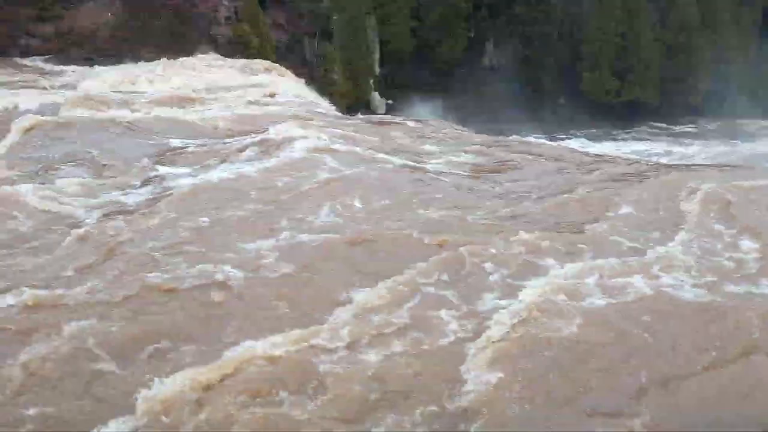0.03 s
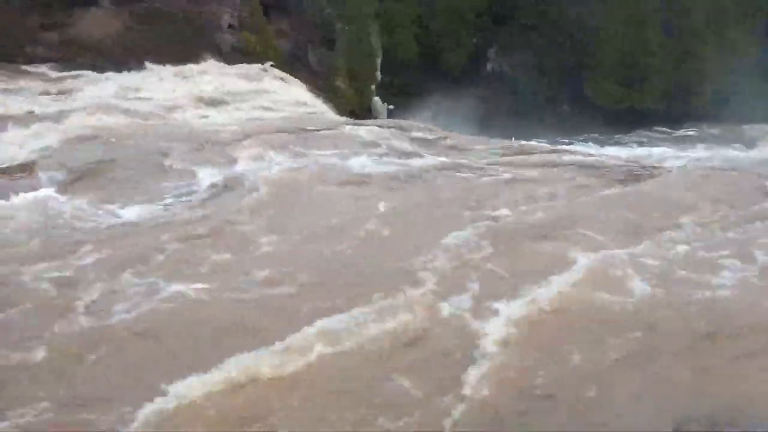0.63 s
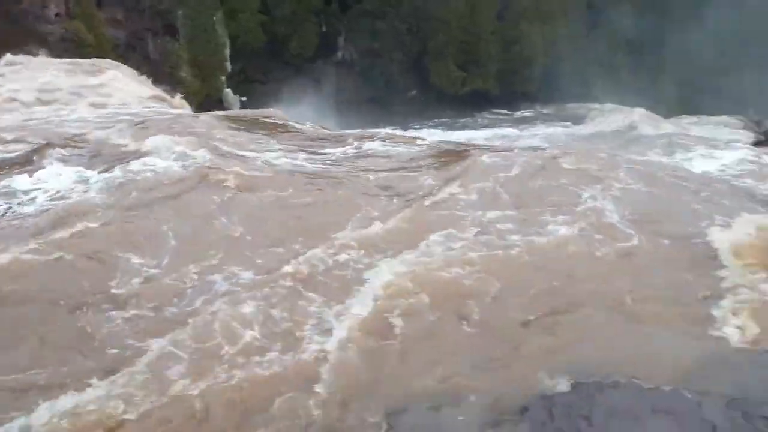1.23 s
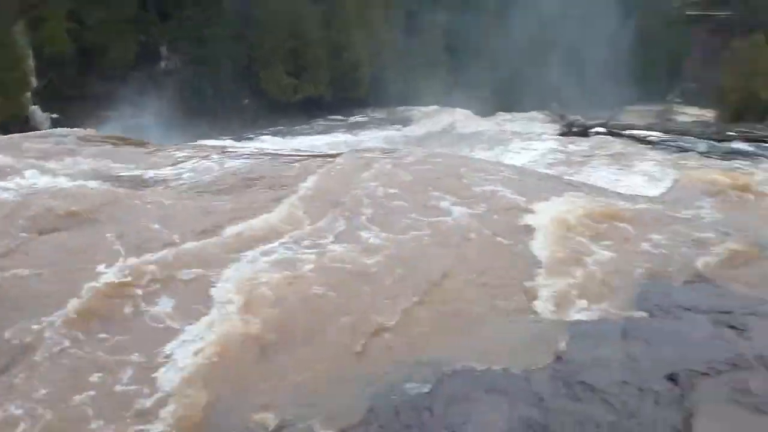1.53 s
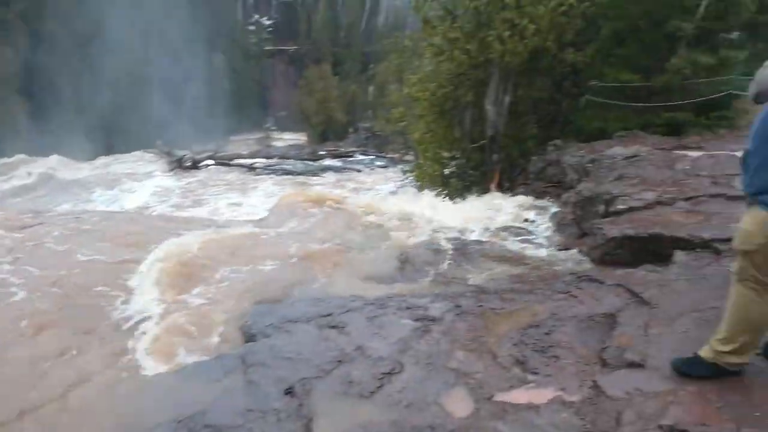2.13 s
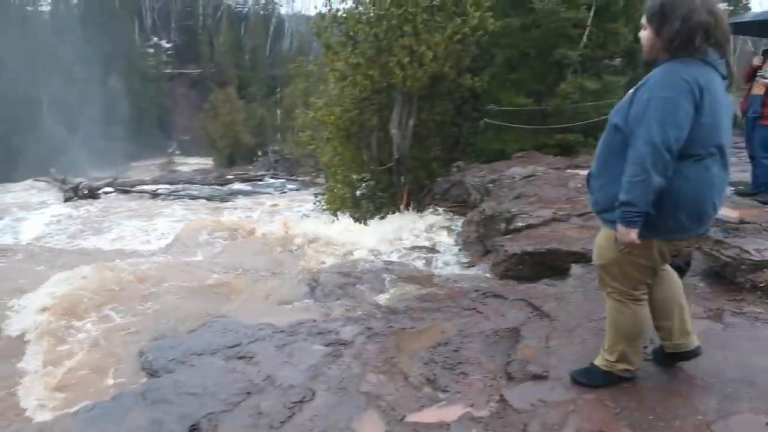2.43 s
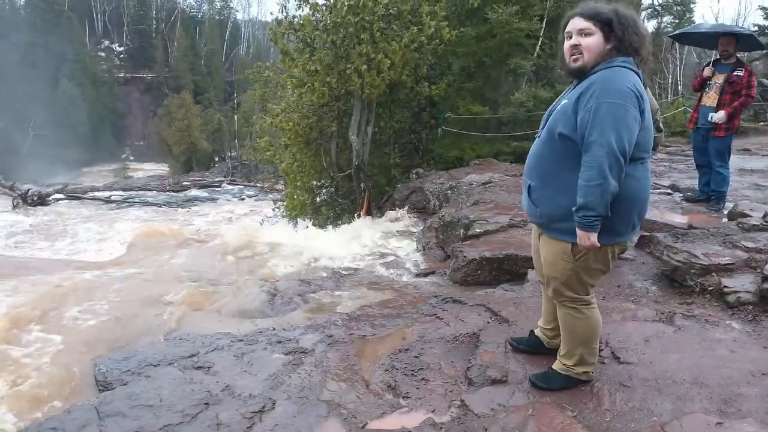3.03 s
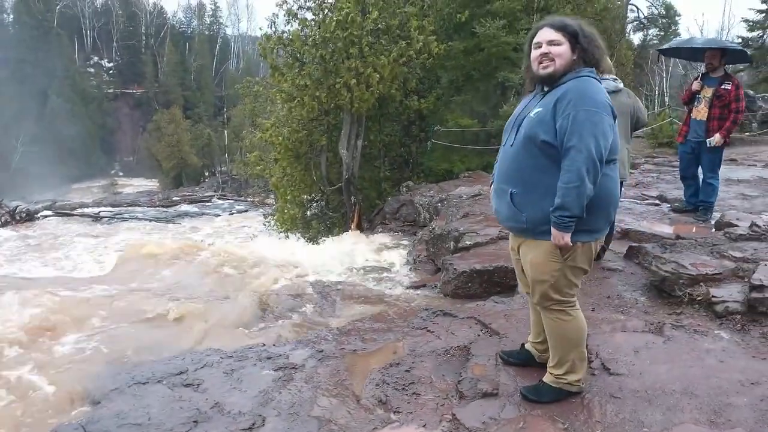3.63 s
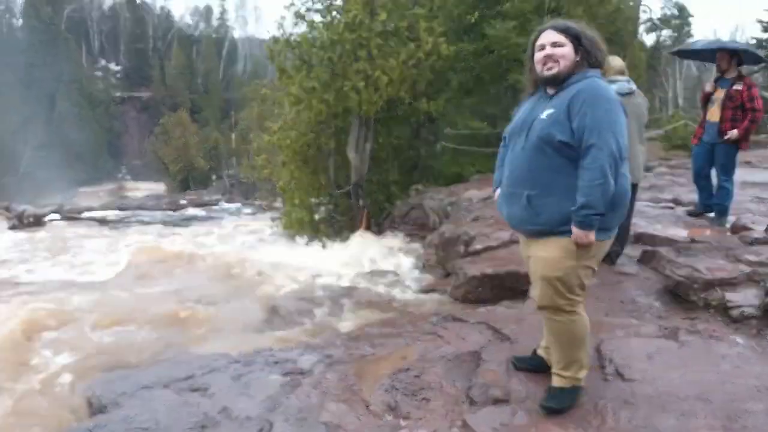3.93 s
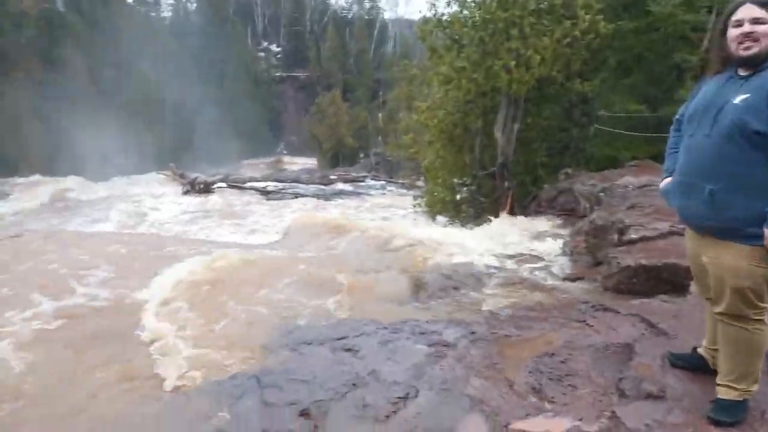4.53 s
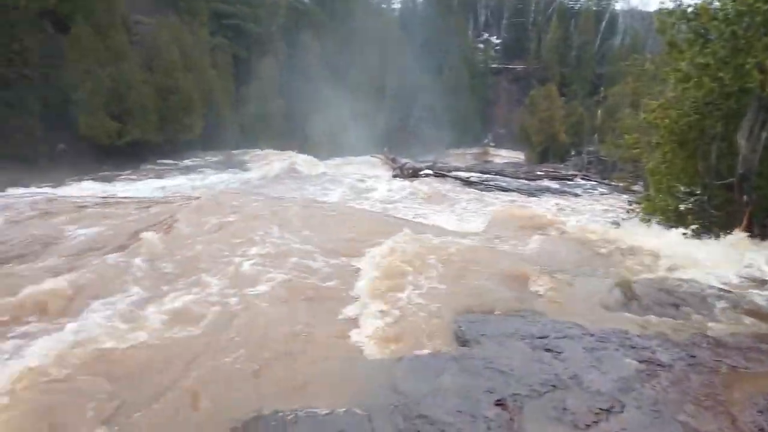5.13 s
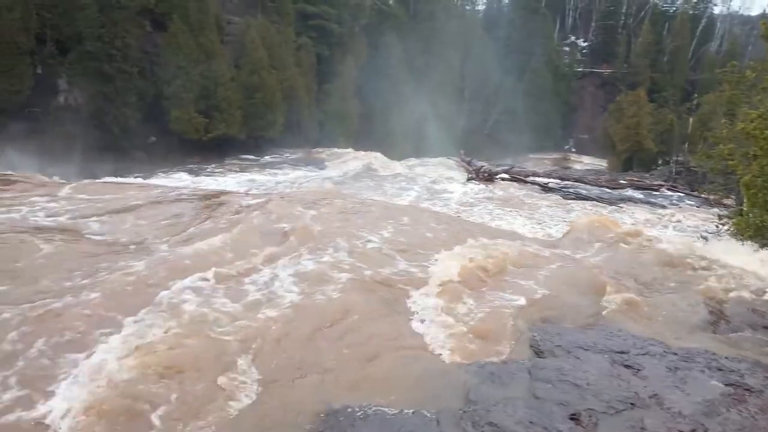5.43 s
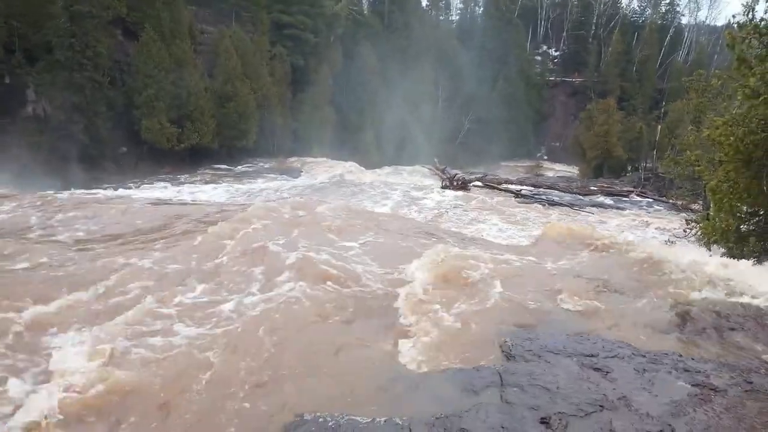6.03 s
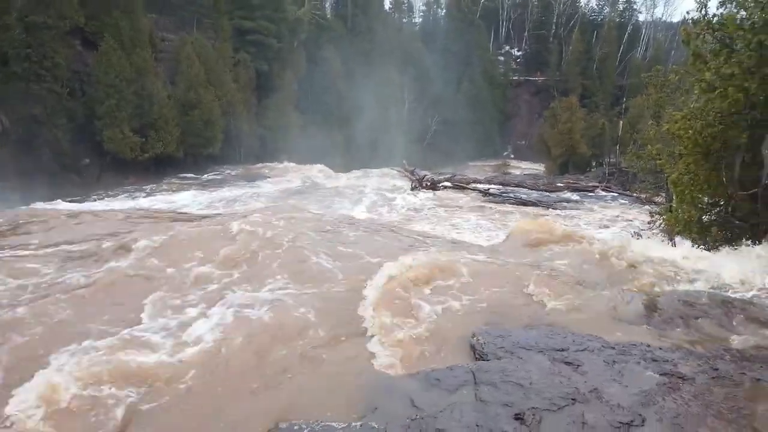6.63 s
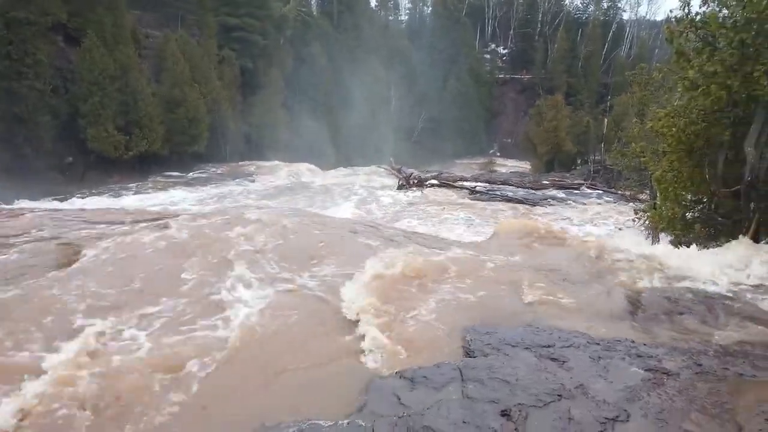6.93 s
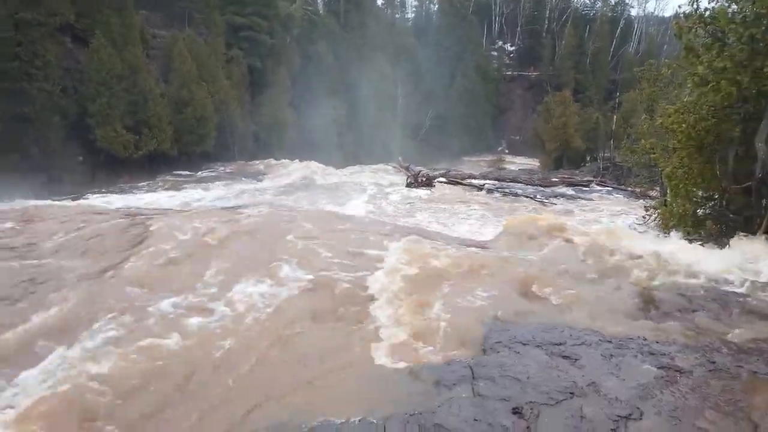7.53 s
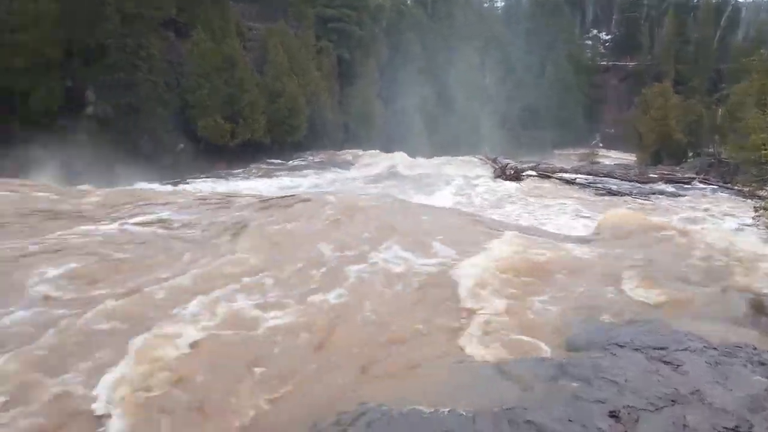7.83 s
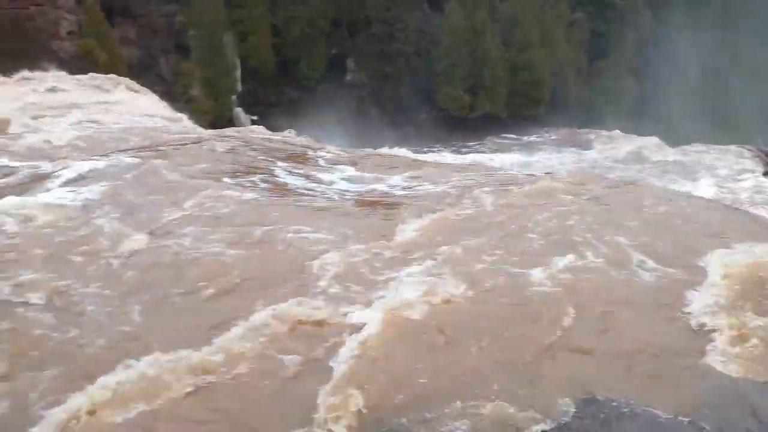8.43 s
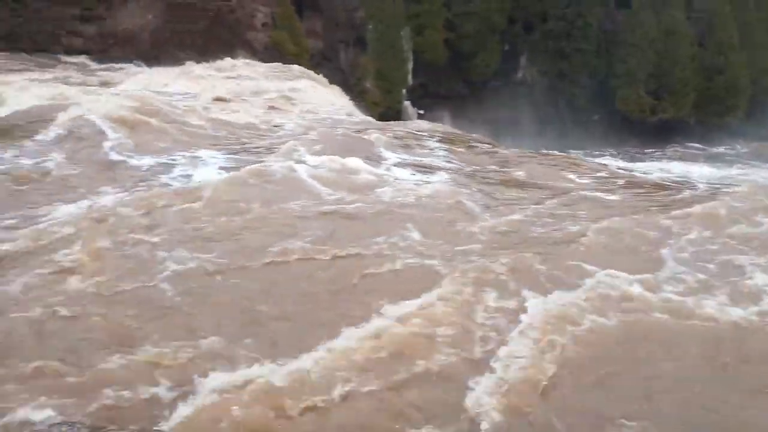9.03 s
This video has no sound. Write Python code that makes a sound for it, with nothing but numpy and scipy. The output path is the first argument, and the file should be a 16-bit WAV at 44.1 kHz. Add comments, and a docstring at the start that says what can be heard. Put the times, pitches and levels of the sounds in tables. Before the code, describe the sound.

A river in flood pours over a large waterfall, heard outdoors from the rocks beside it. After a brief silence the water comes in all at once: a deep roar, a dense rush of rapids and a fine fizz of spray. At about two seconds it sinks to a lower, even level. It turns slightly duller as the microphone faces the bank, and a few faint drops tick close by.

```python
"""A river in flood pours over a large waterfall, heard from the rocks beside it.
After a short silence and one faint blip, the water comes in all at once: clouds of bubbles boom in
the pool, countless small bubbles rush in the rapids, and spray fizzes. At two seconds the sound
sinks to a lower, even level. It is a little duller whenever the microphone turns to the bank.
From about four seconds on, a few drops tick close by."""
import sys
import numpy as np
from scipy import signal
from scipy.fft import rfft, irfft
from scipy.io import wavfile
from scipy.ndimage import uniform_filter1d

SR = 44100
rng = np.random.default_rng(int(sys.argv[2]) if len(sys.argv) > 2 else 0)


def wav_out(sig):
    """Save sig, one row per channel (or a flat mono array), as 16-bit PCM at SR to the path in sys.argv[1]."""
    wavfile.write(sys.argv[1], SR, np.round(np.clip(np.atleast_2d(sig).T, -1, 1) * 32767).astype(np.int16))


N = 410130

# How strong the water sounds at each pitch: (frequency [Hz], relative level [dB])
WATER_TONE = [(28.0, -35.5), (62.0, -14.5), (100.0, -2), (195.0, 0.33), (420.0, -8.5), (950.0, -11.5),
              (1900.0, -10.5), (2450.0, -15), (3000.0, -16), (3650.0, -23.5), (4500.0, -25.5),
              (6400.0, -18.5), (7500.0, -18), (8100.0, -41)]
# Where the microphone points: (time [s], turn [0 = facing the fall, 1 = facing the bank])
MIC_TURN = [(0.9, 0), (2.6, 0.87), (4.1, 1), (5.0, 0.76), (5.45, 0.14), (6.6, 0.41), (7.8, 0.35), (8.5, 0)]
# Drops landing close by: (time [s], relative level [dB], pitch [Hz])
NEAR_DROPS = [(4.2063, -18, 7100), (4.8279, -17, 6630), (5.529, -10, 7440), (9.1581, -14, 6840)]

ROAR_TOP_HZ, SPRAY_FROM_HZ = 702, 3570  # the rapids fill the range between these two


def gain(db):
    """Turn decibels into a number to multiply a sound by."""
    return 10 ** (np.asarray(db) / 20)


def normalize(x):
    """Scale a signal to an average strength (rms) of 1."""
    return x / np.sqrt(np.mean(x ** 2))


def wander(per_second):
    """A smooth random curve of strength 1 that heads for a new value so many times a second."""
    hold = int(SR / per_second)
    steps = rng.standard_normal(2048)[np.arange(N) // hold % 2048]
    return normalize(uniform_filter1d(uniform_filter1d(steps, hold), hold))


def water_band(x, low_hz, high_hz):
    """Give a sound the tone of the water, fading out what lies below low_hz and above high_hz."""
    hz = np.maximum(np.arange(N // 2 + 1) * SR / N, 1)
    table_hz, table_db = np.transpose(WATER_TONE)
    tone = gain(np.interp(np.log(hz), np.log(table_hz), table_db))
    soft_edges = ((1 + (low_hz / hz) ** 10) * (1 + (hz / high_hz) ** 10)) ** -.5
    return normalize(irfft(rfft(x) * soft_edges * tone, N))


def bubble(hz, cycles, glide):
    """A bubble rings, fading 60 dB in so many cycles; its pitch glides up as it nears the surface."""
    elapsed_cycles = np.arange(int(cycles * SR / hz) + 2) * hz / SR
    age = elapsed_cycles / cycles
    return np.sin(2 * np.pi * elapsed_cycles * (1 + glide * age / 2)) * np.exp(-np.log(1000) * age)


def bubble_swarm(low_hz, high_hz, pitches, per_pitch, cycles, glide, spread_db, flurry_db, flurry_rate):
    """Many bubbles ring at random times; a few are much louder, and each pitch comes in flurries."""
    out = np.zeros(N)
    for hz in np.geomspace(low_hz, high_hz, pitches):
        when, chance, coin_flip = rng.random((per_pitch, 3)).T
        strength = np.minimum(-np.log(1 - chance), np.log(300))  # mostly small, now and then large
        kicks = gain(spread_db * strength) * np.sign(coin_flip - .5)
        births = np.bincount((when * N).astype(int), kicks, N)
        rings = signal.oaconvolve(births, bubble(hz, cycles, glide))[:N]  # one ring at every birth
        out += np.sqrt(hz) * normalize(rings) * gain(flurry_db * wander(flurry_rate))
    return out


def pool_roar(throb_db=0.53):
    """Big clouds of trapped air pulse slowly in the pool under the fall and merge into a roar."""
    clouds = bubble_swarm(44.3, 1007, pitches=14, per_pitch=3000, cycles=7.4, glide=0.044,
                          spread_db=2.5, flurry_db=1.0, flurry_rate=6)
    swirl = rng.standard_normal(N)
    roar = water_band(clouds, 15, ROAR_TOP_HZ) + 0.75 * water_band(swirl, 15, ROAR_TOP_HZ)
    return normalize(roar) * gain(throb_db * wander(per_second=9))


def rapids(churn_db, churn_hz=1520, surge_db=0.43):
    """Breaking waves fold in small bubbles; near waves churn, and far ones blur into a wash."""
    bubbles = bubble_swarm(562, 4500, pitches=16, per_pitch=9000, cycles=15, glide=0.19,
                           spread_db=3.0, flurry_db=1.0, flurry_rate=14)
    wash = water_band(rng.standard_normal(N), ROAR_TOP_HZ, SPRAY_FROM_HZ)
    rush = normalize(water_band(bubbles, ROAR_TOP_HZ, SPRAY_FROM_HZ) + wash)
    churn = signal.lfilter(*signal.iirpeak(churn_hz, Q=2.3, fs=SR), rush)
    rush += (gain(churn_db) - 1) * churn  # turn the middle pitches up or down by churn_db
    return rush * gain(surge_db * wander(per_second=12))


def spray(burst_db=0.34):
    """Droplets fall back and foam bursts: a fine fizz over the hiss of the mist."""
    fizz = bubble_swarm(3270, 8380, pitches=10, per_pitch=9000, cycles=23, glide=0.12,
                        spread_db=3.0, flurry_db=1.7, flurry_rate=31)
    mist = rng.standard_normal(N)
    hiss = water_band(fizz, SPRAY_FROM_HZ, 11000) + 1.2 * water_band(mist, SPRAY_FROM_HZ, 9000)
    return normalize(hiss) * gain(burst_db * wander(per_second=22))


def drops(volume_db=-4, top_hz=7600):
    """Each drop rings like one tiny bubble: a high tick with a softened edge."""
    out = np.zeros(N)
    for time_s, level_db, hz in NEAR_DROPS:
        tick = gain(level_db + volume_db) * bubble(hz, cycles=45, glide=.02)
        start = int(time_s * SR)
        out[start:start + len(tick)] += tick[:N - start]
    return signal.sosfilt(signal.butter(20, top_hz, fs=SR, output="sos"), out)


def scene(water_db=-26.5):
    """Roar, rush and fizz sink together; turning to the bank softens the near waves and the spray."""
    t = np.arange(N) / SR
    turned = np.interp(t, *np.transpose(MIC_TURN))
    early_boost_db = np.interp(t, [1.985, 2.7], [8, 0])
    roar = gain(early_boost_db - 2.5) * pool_roar()
    rush = gain(early_boost_db - 4) * rapids(churn_db=2.5 - 3.5 * turned)
    fizz = gain(early_boost_db - 8.5 - 2.5 * turned) * spray()
    return (gain(water_db) * (roar + rush + fizz) + drops())[None]


def record(dry, top_hz=8280):
    """Silence, one faint blip of the water, then a quick fade-in; the highest pitches are cut off."""
    blip_at_s, blip_length_s, blip_db = .1765, .007, -21
    open_at_s, fade_in_s, open_from_db = .362, 0.034, -11
    t = np.arange(N) / SR
    blip = gain(blip_db) * ((t >= blip_at_s) & (t < blip_at_s + blip_length_s))
    since_open_s = np.maximum(t - open_at_s, 0)
    opening = (t >= open_at_s) * gain(open_from_db * np.exp(-since_open_s / fade_in_s))
    low_pass = signal.ellip(10, .1, 80, top_hz, fs=SR, output="sos")
    return signal.sosfilt(low_pass, dry * (blip + opening))


dry = scene()
out = record(dry)
wav_out(out)
```